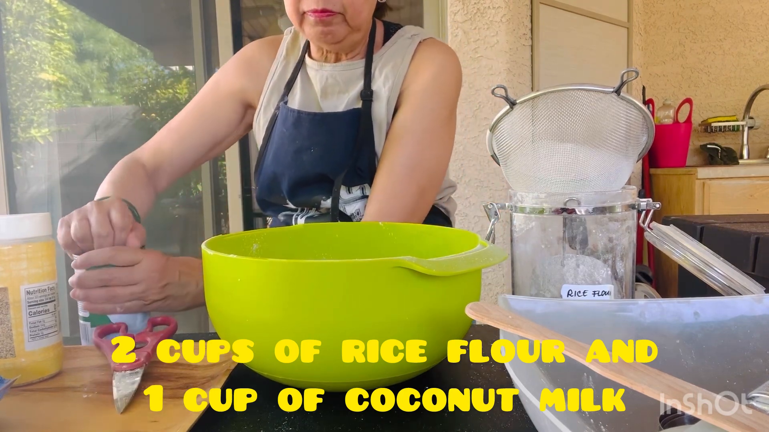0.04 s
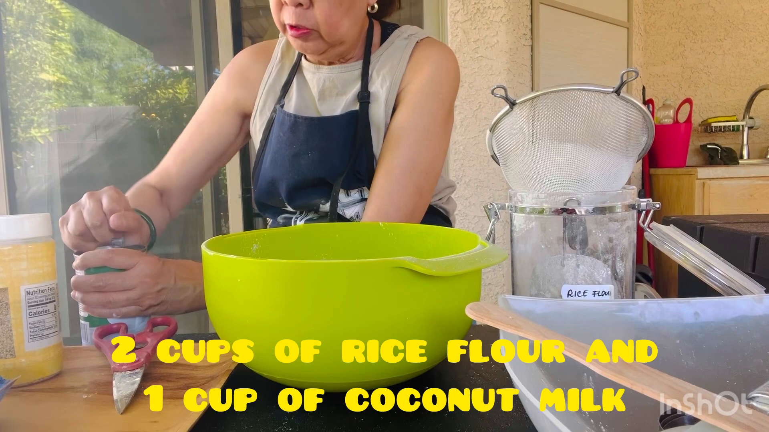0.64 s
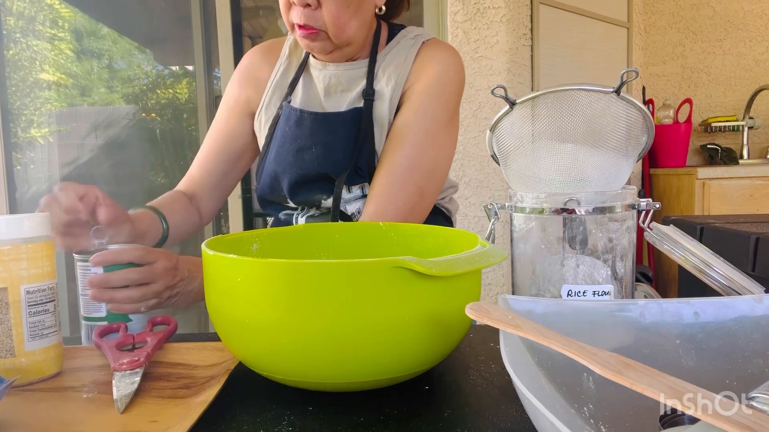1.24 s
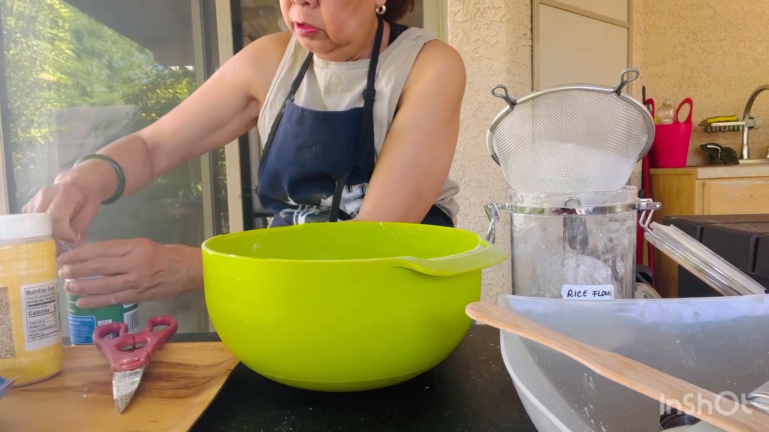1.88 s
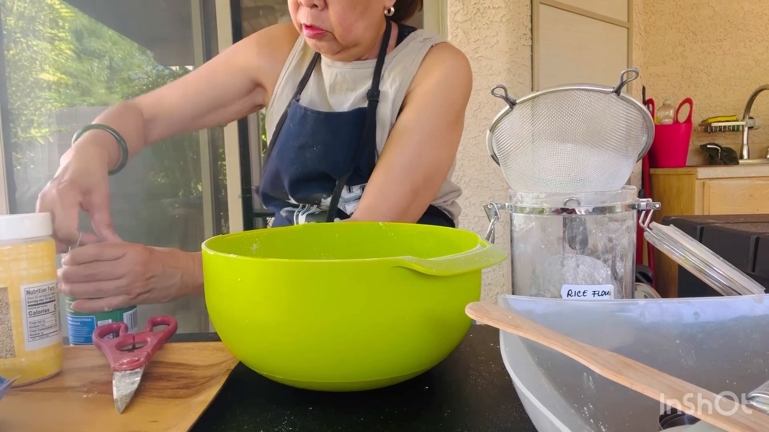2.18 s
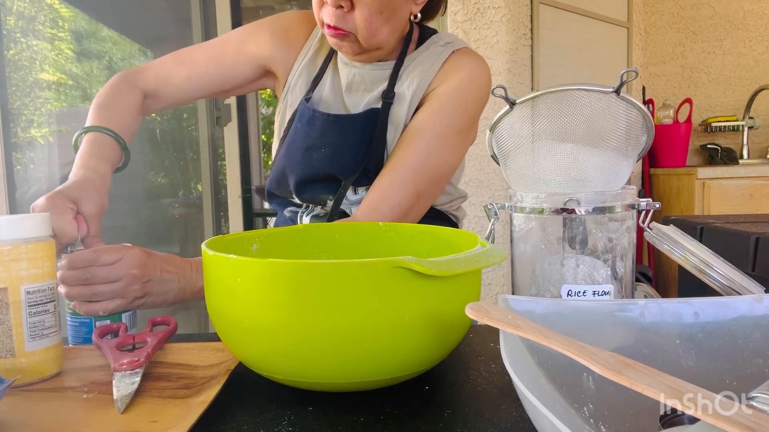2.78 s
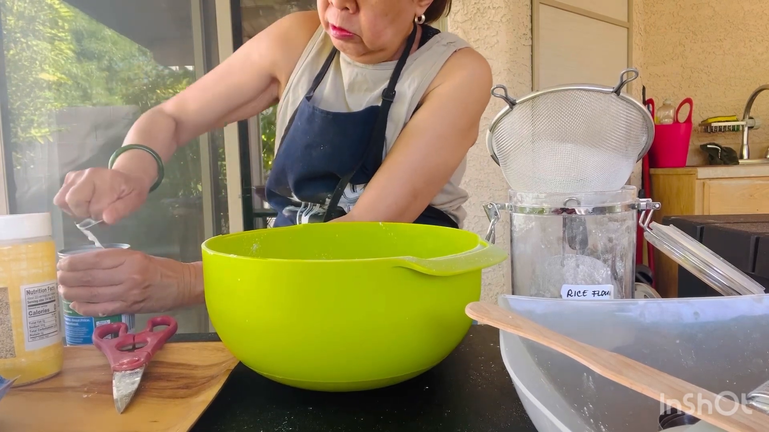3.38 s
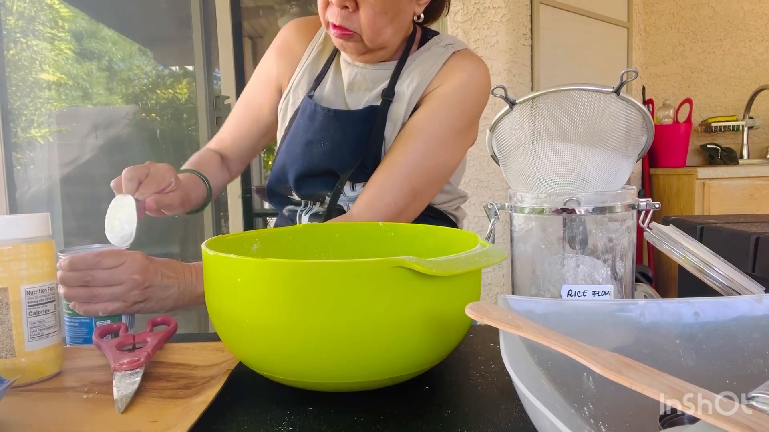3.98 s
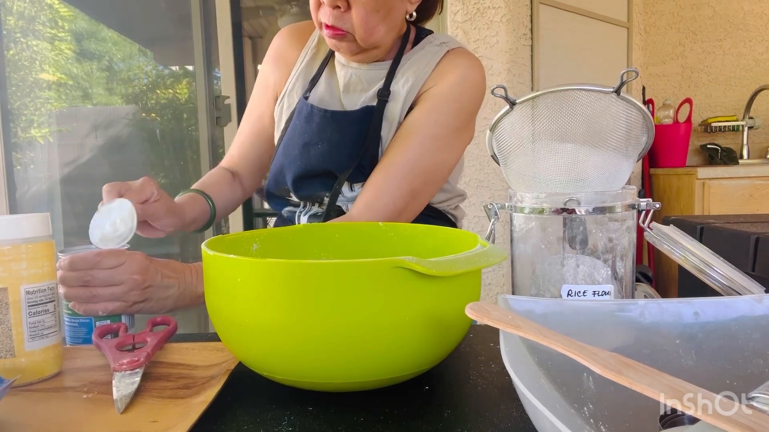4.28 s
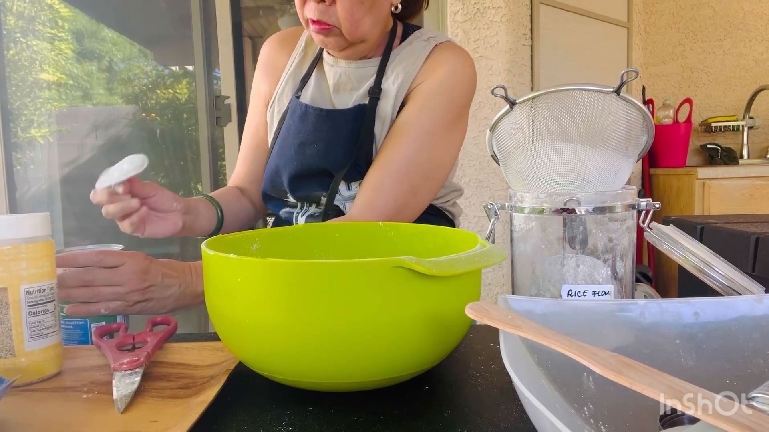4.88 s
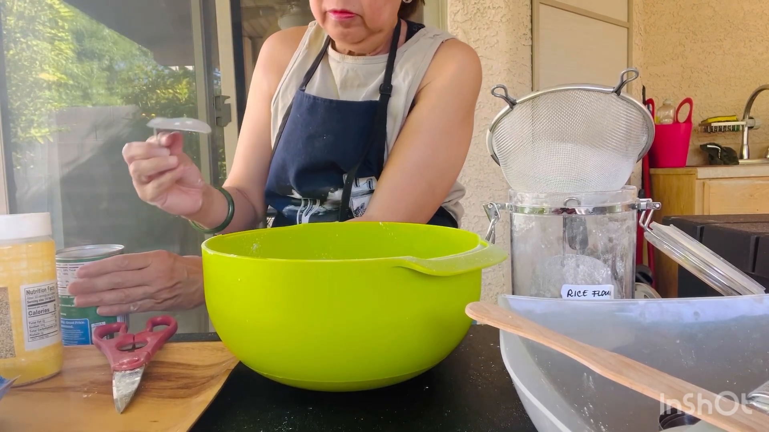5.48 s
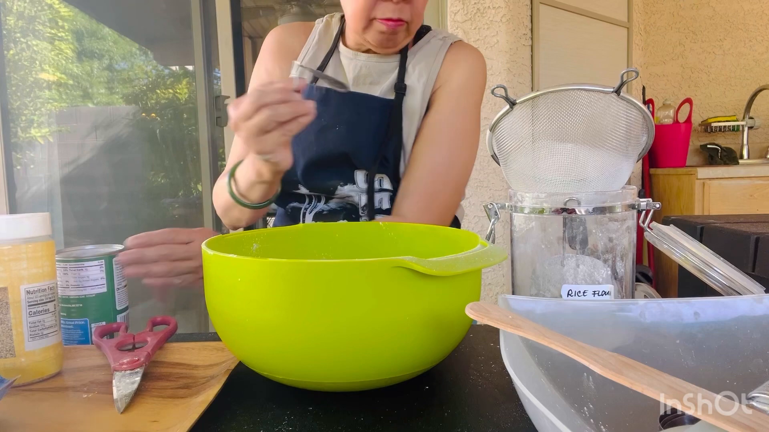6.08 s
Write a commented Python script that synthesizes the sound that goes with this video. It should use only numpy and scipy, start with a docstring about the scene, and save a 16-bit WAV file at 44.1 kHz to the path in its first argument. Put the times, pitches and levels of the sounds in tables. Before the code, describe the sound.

A ring-pull can is opened on a wooden board on a covered patio, close to the microphone and slightly left. The tab pierces the lid with a sharp metallic crack. Fingers softly rub, tap and scratch the can. Then the lid buckles with a crunch and a dull thump, peels back in scratchy jerks and snaps free. Low machine hum and outdoor rumble continue throughout.

```python
"""A ring-pull can is opened on a wooden board on a covered patio, a little left of the microphone.
Machines hum throughout. Hands rub the can, and at 0.6 s the tab pierces the lid. Fingers tap and
scratch; at 2.8 s the lid buckles, then peels along its score in jerks and snaps free near 4.1 s.
Each fracture is a train of impulses exciting the lid's modes, which differ from stage to stage.
Last come a few faint rubs and one soft low tone."""
import sys
import numpy as np
from scipy import signal
from scipy.fft import rfft, irfft, next_fast_len
from scipy.io import wavfile
from scipy.ndimage import uniform_filter1d, map_coordinates

SR = 44100
rng = np.random.default_rng(int(sys.argv[2]) if len(sys.argv) > 2 else 0)


def dump_mix(stems):
    """Bounce the given channels to the path in sys.argv[1] as a 16-bit WAV at rate SR."""
    frames = np.atleast_2d(stems).T  # one column per channel
    limited = np.clip(frames, -1, 1)  # hard clip at full scale
    pcm = np.round(limited * 32767).astype(np.int16)
    wavfile.write(sys.argv[1], SR, pcm)


N = 270887

# outdoor rumble: f/Hz, relative spectral level/dB
RUMBLE_SPECTRUM = [(12, -45.5), (20, -21), (38, -15), (62, -12.5), (86, -5), (123, -4.5), (149, -8.5),
                   (236, -11), (270, -11), (451, -16.5), (735, -21.5), (1230, -27), (2360, -43),
                   (5920, -58.5), (13000, -73.5)]
# rumble and nearby scatter: f/Hz, left-right coherence
RUMBLE_COHERENCE = [(60, 0.94), (130, 0.81), (290, 0.58), (640, 0.034), (3000, 0.051), (12000, 0.52)]
SCATTER_COHERENCE = [(1000, 0.89), (2500, 0.1), (6500, 0.1), (9000, 0.94), (11000, 1)]
# machine partials: f/Hz, level/dB, waver/dB
HUM_PARTIALS = [(38.4, -60, 2), (54.6, -53.5, 2.5), (78.7, -60, 6), (118.45, -57.5, -0.5),
                (126.9, -63, -0.5), (237.7, -66, 3.5)]
# patio reverberation: f/Hz, T60/s
PATIO_T60 = [(150, 0.21), (800, 0.23), (2000, 0.21), (6000, 0.2), (12000, 0.18), (15000, 0.091)]
# board to microphone ports: f/Hz, left minus right level/dB
PORT_BALANCE = [(200, 0), (550, 3), (900, 2), (2000, -2.5), (4000, -2.5), (5500, -5), (7500, -5), (9500, 2),
                (11000, -1)]
# the same path: f/Hz, phase lead of the left port/rad
PORT_LEAD = [(100, 0), (1200, 0.76), (2300, 1.3), (4600, 3), (5500, 4.5), (7000, 3), (9600, 5),
             (10800, 5.5), (12600, 6), (14500, 10)]
# spectral envelopes of reflections, skin friction, can, tab and lid stages: f/Hz, relative level/dB
WALL_COLOUR = [(500, 3), (1000, -2), (2200, 2), (4200, 1.5), (5500, -5.5), (7500, -6), (13000, -3)]
SKIN_COLOUR = [(150, -66.5), (400, -1.5), (800, 7), (1600, 3), (2600, -1.5), (4500, -3.5), (6500, -3.5),
               (8300, -8), (11000, -7.5), (13200, -7.5), (14500, -15.5), (16000, -51.5)]
CAN_COLOUR = [(120, 6), (200, 11.5), (350, -4), (650, -7), (1300, -7.5), (2500, -23), (5000, -22),
              (12000, -24.5), (16000, -49)]
TAB_COLOUR = [(150, -9.5), (600, 3.5), (1600, -10), (3300, -16.5), (6500, -13), (9000, -17), (13000, -24.5),
              (16000, -42)]
SEALED_COLOUR = [(150, -4), (430, -11.5), (700, -2.5), (950, -4), (1400, -13), (2050, -1), (2700, -10),
                 (3400, 2), (4400, -1), (5500, 5), (7000, 0.5), (9000, 1), (13000, -1), (16000, -16)]
BUCKLED_COLOUR = [(45, -28.5), (80, 6), (130, 1), (220, -9), (450, -1.5), (620, -11.5), (900, -3.5),
                  (1250, -4), (1800, -9), (2700, -15), (5300, -9), (8500, -14.5), (12000, -21.5),
                  (16000, -33)]
PEELED_COLOUR = [(150, 5), (580, 9), (1100, 4.5), (1400, -3.5), (2100, -2), (2900, -10), (4300, -10.5),
                 (7000, -16), (8400, -22.5), (10500, -24), (13500, -23.5), (16000, -44)]
LOOSE_COLOUR = [(150, -0.5), (350, -5.5), (550, -1.5), (780, -3), (1050, -0.5), (1450, -1.5), (2000, -0.5),
                (2800, 1), (4100, 1), (5300, 6), (7000, 4.5), (12000, 1.5), (14000, -1.5), (16000, -17.5)]
# modes standing above those envelopes: f/Hz, bandwidth/Hz, lift/dB
CAN_PEAKS = [(570, 20, 4.9), (700, 7.5, 18.7), (1660, 21, 5.2)]
TAB_PEAKS = [(565, 25, 24), (1600, 21, 20), (3316, 65, 23.5), (4160, 100, 13), (4900, 30, 24.5),
             (8800, 210, 19.5)]
SEALED_PEAKS = [(690, 26, 7), (944, 140, 1.2), (1939, 120, 2.5), (2200, 110, 2.9), (3450, 260, 2),
                (5490, 310, 2.7), (8440, 220, 3), (12530, 160, 3)]
BUCKLED_PEAKS = [(488, 54, 2.9), (1820, 180, 3.5), (2250, 180, 9.7), (3155, 115, 11), (5240, 150, 5),
                 (6940, 170, 5)]
PEELED_PEAKS = [(1230, 45, 8.5), (1660, 69, 4.9), (1813, 39, 12.2), (2230, 38, 9.4), (2850, 45, 5),
                (3540, 240, 5.5), (4180, 130, 9.5)]
LOOSE_PEAKS = [(457, 30, 8.6), (564, 70, 3.1), (1120, 40, 4), (1470, 85, 3), (2120, 45, 3.5),
               (2480, 27, 7.4), (3140, 91, 7.2), (4720, 90, 6), (5950, 50, 3), (7330, 73, 3.6),
               (9250, 60, 4.7)]
# faint tones: centre t/s, f/Hz, level/dB, half-duration/s, phase waver/rad
FAINT_TONES = [(2.614, 3980, -67.5, 0.0053, 4.3), (3.284, 4010, -80.5, 0.068, 0.77),
               (4.362, 6000, -73, 0.052, 1.58), (5.665, 451, -54.5, 0.055, 0.27)]
# hands and cloth slide: peak t/s, relative level/dB, duration/s, extra hiss/dB
SLIDES = [(0.106, -66.5, 0.064, 1), (0.223, -67, 0.11, -3), (0.825, -61.5, 0.2, -11.5),
          (1.121, -60, 0.11, -3), (1.507, -61.5, 0.27, -0.5), (1.629, -56.5, 0.021, 7),
          (1.648, -62, 0.18, 5), (2.044, -72.5, 0.13, 3.5), (2.436, -74, 0.19, 0),
          (4.564, -63.5, 0.053, -4), (4.86, -87.5, 0.063, 11.5), (6.14, -62, 0.11, -6.5)]
# fingers on the can: peak t/s, level/dB, duration/s, touched spot's resonance f/Hz
FINGER_TAPS = [(1.164, -52, 0.014, 1190), (1.281, -48.5, 0.047, 920), (1.337, -39, 0.0046, 724),
               (1.382, -42, 0.0055, 700), (1.497, -49, 0.015, 1150), (1.624, -42, 0.016, 744),
               (1.655, -47, 0.011, 1080), (1.664, -46, 0.076, 200), (1.79, -52, 0.019, 870),
               (1.831, -50, 0.023, 590), (2.051, -50.5, 0.0055, 560), (2.121, -55, 0.019, 580),
               (2.563, -55, .003, 700), (2.638, -61.5, 0.0035, 760)]
# fingernail on the tab: peak t/s, level/dB, duration/s
NAIL_SCRATCHES = [(2.052, -47.5, 0.014), (2.107, -55.5, 0.039)]
# the can jolts the board: t/s, level/dB, f/Hz
BOARD_THUMPS = [(0.621, -45, 183.5), (2.831, -34, 81.6), (3.36, -41, 69)]
# lid stages (sealed, buckled, peeled, loose): start t/s
STAGE_TIMES = [0, 2.7, 2.95, 3.53]
# radiation of the tilting lid, by stage: left minus right level/dB
STAGE_BALANCE = [-1.2, 1.6, 0.62, -0.33]
# sound sent to the walls, by stage: relative level/dB
STAGE_REVERB = [-9, -7, -6.5, -6.5]
# zing of the torn edge: t/s, lift/dB
EDGE_LIFT = [(3.5, -11), (3.58, 10.5), (3.66, -5), (3.78, -9), (3.89, -11), (3.935, 9), (3.98, 15),
             (4.075, 9.5), (4.22, 13)]
# one resonance per strain on the lid: start t/s, f/Hz, glide/(octave/s), lift/dB, Q
LID_STRAINS = [(0.6, 866, 0.5, 13.5, 4), (0.619, 2020, -0.5, 9, 4.2), (2.775, 644, 7, 20.5, 5.1),
               (2.82, 880, 8.5, 20, 7.3), (2.853, 1170, 9, 16, 3.9), (2.98, 1580, -1, 15.5, 3.4),
               (3.04, 1240, -13, 16.5, 3.5), (3.085, 1410, 3, 24, 8.4), (3.14, 1490, 4, 20.5, 6),
               (3.195, 1790, -0.5, 13.5, 12), (3.33, 1840, 0, 10.5, 15), (3.41, 1800, 0.5, 8.5, 5),
               (3.55, 2040, -1, 11.5, 14), (3.62, 550, 4, 3, 5.7), (3.75, 1530, 2, 19, 7.3),
               (3.83, 1470, -2.5, 13, 3.7), (3.91, 1340, 2, 15.5, 8.2), (3.955, 950, 5, 4, 1.6),
               (4.06, 1550, 12, 4, 4), (4.19, 1094, -3, 14.5, 5)]
# gradual tearing: peak t/s, level/dB, duration/s, tilt/(dB/octave)
LID_PULLS = [(0.618, -21, 0.0028, -0.5), (2.781, -46, 0.0029, -5.5), (2.807, -29.5, 0.0054, 1.5),
             (2.832, -23.5, 0.0078, 0.5), (2.845, -25.5, 0.0043, -2), (2.863, -32, 0.0089, -2),
             (2.874, -38, 0.0096, -2.5), (3.023, -44, 0.026, 0), (3.063, -43, 0.022, 2.5),
             (3.107, -43, .016, 2), (3.168, -39.5, 0.019, 3.5), (3.203, -43.5, 0.02, 1),
             (3.264, -50.5, 0.021, 4.5), (3.368, -44.5, 0.017, 2.5), (3.46, -42, 0.024, 2.5),
             (3.597, -42, 0.027, -5), (3.635, -45, 0.0162, -8.5), (3.691, -58.5, 0.04, -9),
             (3.781, -51, 0.012, -6), (3.871, -47.5, 0.021, -5.5), (3.934, -37.5, 0.018, -4),
             (3.974, -37.5, 0.024, -7.5), (4.09, -34.5, 0.0067, -1), (4.222, -52.5, 0.025, -5),
             (4.325, -59, 0.023, -6.5)]
# sudden fractures: t/s, level/dB, tilt/(dB/octave)
LID_SNAPS = [(0.6022, -31.5, -6), (0.6146, -17.5, -2.5), (0.6206, -15.5, 4), (0.6242, -9.5, 1),
             (2.8301, -28.5, 3), (2.865, -34, 2), (3.06, -44, -6), (3.165, -35, -2), (3.179, -42, -1.5),
             (3.357, -37, 5), (3.778, -49, -4), (3.8507, -42, -1.5), (3.8659, -36, -0.5), (3.885, -38, 1),
             (3.921, -34, -1), (3.9372, -26, 1), (3.948, -31, -2), (3.962, -23.5, -1.5), (3.972, -29, -6),
             (3.981, -27.5, 3), (3.987, -28.5, -1), (4.0704, -17.5, 0.5), (4.0739, -13.5, -0.5),
             (4.081, -22.5, 0.5), (4.085, -24, -3.5)]
# crack statistics: rate/(1/s), rise as a multiple of duration, size spread/dB, main crack's weight
PULL_CRACKS = (2200, 1.16, 5, 0)
SNAP_CRACKS = (4900, 0.65, 7.3, 0.42)


def amp(db):
    """Amplitude ratio of a level in decibels."""
    return 10 ** (np.asarray(db) / 20)


def unit(x):
    """Normalisation to unit rms."""
    return x / np.sqrt(np.mean(x ** 2) + 1e-20)


def along(points, hz):
    """Interpolation on a logarithmic frequency axis."""
    f, v = np.transpose(points)
    return np.interp(np.log(hz + 1), np.log(f + 1), v)


def wobble(rate):
    """Random modulation: a spline through `rate` knots a second."""
    return map_coordinates(rng.standard_normal(int(N * rate / SR) + 4), [np.arange(N) * rate / SR])


def filtered(x, response):
    """Linear filtering: the spectrum times a frequency response."""
    n = x.shape[-1]
    m = next_fast_len(n + SR // 8)
    return irfft(rfft(x, m) * response(np.fft.rfftfreq(m, 1 / SR)), m)[..., :n]


def blend(pair, coherence):
    """Partial coherence: sum and difference of two independent, weighted noises."""
    angle = lambda hz: np.arccos(np.clip(along(coherence, hz), -1, 1)) / 2
    mid, side = filtered(pair, lambda hz: np.array([np.cos(angle(hz)), np.sin(angle(hz))]))
    return np.array([mid + side, mid - side])


def coloured_noise(spectrum, coherence):
    """Spectral shaping of stereo white noise, at unit rms."""
    white = blend(rng.standard_normal((2, N)), coherence)
    return unit(filtered(white, lambda hz: amp(along(spectrum, hz))))


def background(rumble_db=-54, drift_rad=0.48):
    """Superposition: machine partials, wavering in amplitude and phase, over outdoor rumble."""
    t = np.arange(N) / SR
    hum = 0
    for hz, db, waver_db in HUM_PARTIALS:
        envelope = amp(waver_db * wobble(4))
        hum += amp(db) * unit(envelope * np.sin(2 * np.pi * hz * t + drift_rad * wobble(4.3)))
    return hum + amp(rumble_db) * coloured_noise(RUMBLE_SPECTRUM, RUMBLE_COHERENCE)


def patio(near_db=1.0, near_t60=0.02, far_db=-6.0, far_rise_s=0.0023):
    """Impulse response: direct sound, scatter from a bowl and jars, reverberation of walls and roof."""
    hz, t, spectra = signal.stft(rng.standard_normal((2, SR // 3)), SR, nperseg=256)
    decay = amp(-60 * t / along(PATIO_T60, hz)[:, None])
    far = signal.istft(spectra * decay, SR, nperseg=256)[1]
    t = np.arange(far.shape[1]) / SR
    far = far * (1 - np.exp(-t / far_rise_s))
    far = filtered(far / np.linalg.norm(far[0]), lambda hz: amp(along(WALL_COLOUR, hz)))
    near = blend(rng.standard_normal(far.shape), SCATTER_COHERENCE) * amp(-60 * t / near_t60)
    near = filtered(near, lambda hz: hz / (hz + 1500))  # small things scatter only short waves
    path = amp(near_db) * near / np.linalg.norm(near[0]) + amp(far_db) * far
    path[:, 0] += 1
    return path


def faint_tones(wavers_per_s=200):
    """Phase-modulated tone bursts: thin squeaks of the bending lid and one soft low tone."""
    t = np.arange(N) / SR
    tones = 0
    for s, hz, db, length, waver in FAINT_TONES:
        envelope = amp(db) * np.exp(-((t - s) / length) ** 2)
        tones += envelope * np.sin(2 * np.pi * hz * t + waver * wobble(wavers_per_s))
    return tones


def shifting_contact(x, depth_db):
    """A shifting contact modulates the noise in patches of frequency and time."""
    spectra = signal.stft(x, nperseg=512)[2]
    field = uniform_filter1d(rng.standard_normal(spectra.shape[1:]), size=5, axis=0)
    field = uniform_filter1d(field, size=7, axis=1)
    return unit(signal.istft(spectra * amp(depth_db * unit(field)), nperseg=512)[1][:, :N])


def rubbing(gain_db=2, resting_db=-83.0, grain_db=0.5, hiss_hz=3500, ripple_db=2, ripple_hz=60):
    """Friction noise of skin and cloth, coloured by the can's weak modes; slides add in power."""
    t = np.arange(N) / SR
    modes = rng.standard_normal(SR // 2)
    ripple = lambda hz: amp(ripple_db * map_coordinates(modes, [hz / ripple_hz]))
    noise = unit(filtered(coloured_noise(SKIN_COLOUR, SCATTER_COHERENCE), ripple))
    noise = amp(gain_db + grain_db * wobble(110)) * shifting_contact(noise, depth_db=2.5)
    hiss = filtered(noise, lambda hz: hz ** 2 / (hz ** 2 + hiss_hz ** 2))
    body_power = hiss_power = amp(resting_db) ** 2  # resting hands are never quite still
    for s, db, length, hiss_db in SLIDES:
        width = length * np.where(t < s, 0.81, 0.91)  # rise, fade
        power = amp(db) ** 2 * np.exp(-((t - s) / width) ** 2)
        body_power = body_power + power
        hiss_power = hiss_power + power * amp(hiss_db) ** 2
    return np.sqrt(body_power) * (noise - hiss) + np.sqrt(hiss_power) * hiss


def metal_response(colour, modes, tilt_db, low_hz=0, ripple_db=2, ripple_hz=70, size=16384):
    """Modal resonance: the minimum-phase impulse response of thin metal."""
    hz = np.fft.rfftfreq(size, 1 / SR)
    lift = 1 + sum(amp(db) ** 2 / (1 + (2 * (hz - centre) / width) ** 2) for centre, width, db in modes)
    tilt = tilt_db * np.log2(np.maximum(hz, 600)) - 10 * np.log10(1 + (low_hz / (hz + 1)) ** 2)
    # countless weak modes shift with every change of grip and strain
    ripple = ripple_db * map_coordinates(rng.standard_normal(size), [hz / ripple_hz])
    magnitude = amp(along(colour, hz) + tilt + ripple) * np.sqrt(lift)
    cepstrum = irfft(np.log(magnitude))
    cepstrum[1:size // 2] *= 2  # folding the cepstrum makes the response causal
    cepstrum[size // 2 + 1:] = 0
    return irfft(np.exp(rfft(cepstrum)))


def bending(x, times, strain):
    """A time-varying resonator: one mode glides in frequency as the lid bends."""
    start, start_hz, glide, lift_db, q = strain
    hz = start_hz * 2 ** (glide * np.clip(times - start, 0, .15))
    carrier = np.exp(2j * np.pi * np.cumsum(hz) / SR)
    pole = np.exp(-np.pi * start_hz / q / SR)
    resonance = np.real(carrier * signal.lfilter([1 - pole], [1, -pole], x / carrier))
    return x + 2 * (amp(lift_db) - 1) * resonance


def add_cracks(track, s, db, length, response, path, cracks_per_s=6000, rise=0.69, spread_db=4,
               main_crack=0, clump_db=2.0, clumps_per_s=220, fade=1.4, strain=None):
    """Stick-slip excitation: random impulses swell to time s and fade, convolved with metal and path."""
    t = np.arange(-SR // 10, SR // 10) / SR
    occurs = rng.random(len(t)) < cracks_per_s / SR
    sizes, clumps = rng.standard_normal((2, len(t)))
    size_db = spread_db * sizes + clump_db * map_coordinates(clumps, [(t - t[0]) * clumps_per_s])
    swell = np.exp(-(t / (length * np.where(t < 0, rise, fade))) ** 2)
    cracks = occurs * np.sign(rng.standard_normal(len(t))) * amp(size_db) * swell
    cracks[len(t) // 2] += main_crack * np.linalg.norm(cracks)  # in a snap one crack stands out
    if strain is not None:
        cracks = bending(cracks, s + t, strain)
    ringing = signal.fftconvolve(cracks, response)
    heard = signal.fftconvolve(ringing[None], path, axes=1)
    heard *= amp(db) * np.sqrt(2 * length * SR) / (np.linalg.norm(heard) + 1e-20)
    place = track[:, round((s + t[0]) * SR):][:, :heard.shape[1]]
    place += heard[:, :place.shape[1]]


def fingers(path, spot_q=5, spot_db=10):
    """Damped vibration: soft knocks and scrapes excite the full can, held in the hand."""
    track = np.zeros((2, N))
    for s, db, length, spot_hz in FINGER_TAPS:
        modes = [*CAN_PEAKS, (spot_hz, spot_hz / spot_q, spot_db)]
        add_cracks(track, s, db, length, metal_response(CAN_COLOUR, modes, tilt_db=-1.0), path)
    return track


def tab(path):
    """Frictional excitation: a fingernail scratches the raised tab, whose modes ring faintly."""
    track = np.zeros((2, N))
    for s, db, length in NAIL_SCRATCHES:
        add_cracks(track, s, db, length, metal_response(TAB_COLOUR, TAB_PEAKS, tilt_db=0), path)
    return track


def board_thumps(t60=0.28, rise_s=.006):
    """Reaction force: as the lid gives way, the can pushes the board, a damped oscillator."""
    thumps = 0
    for s, db, hz in BOARD_THUMPS:
        t = np.maximum(np.arange(N) / SR - s, 0)
        envelope = amp(db - 60 * t / t60) * (1 - np.exp(-t / rise_s))
        thumps += envelope * np.sin(2 * np.pi * hz * t)
    return thumps


def lid(snap_s=0.0014, snap_low_hz=600, edge_hz=5520, edge_width_hz=520):
    """Fracture along the score excites a plate whose modes change as it bends and comes free."""
    stages = [(SEALED_COLOUR, SEALED_PEAKS), (BUCKLED_COLOUR, BUCKLED_PEAKS),
              (PEELED_COLOUR, PEELED_PEAKS), (LOOSE_COLOUR, LOOSE_PEAKS)]
    stage_at = lambda s: np.searchsorted(STAGE_TIMES, s) - 1
    strain_times = [row[0] for row in LID_STRAINS]
    # hand and lid move with each strain, and the reflections with them
    paths = [patio(far_db=STAGE_REVERB[stage_at(s)]) for s in strain_times]
    # a snap is too brief to drive the lid much below snap_low_hz
    snaps = [(s, db, snap_s, tilt_db, SNAP_CRACKS, snap_low_hz) for s, db, tilt_db in LID_SNAPS]
    pulls = [(*pull, PULL_CRACKS, 0) for pull in LID_PULLS]
    track = np.zeros((2, N))
    for s, db, length, tilt_db, grain, low_hz in snaps + pulls:
        colour, modes = stages[stage_at(s)]
        pan = amp(STAGE_BALANCE[stage_at(s)] * np.array([[.5], [-.5]]))
        bend = np.searchsorted(strain_times[1:], s)
        edge = (edge_hz, edge_width_hz, np.interp(s, *np.transpose(EDGE_LIFT)))
        response = metal_response(colour, [*modes, edge], tilt_db, low_hz)
        add_cracks(track, s, db, length, response, pan * paths[bend], *grain, strain=LID_STRAINS[bend])
    return track


def scene():
    """Superposition at two ports, which the can's sound reaches with level and phase differences."""
    path = patio()
    can = lid() + fingers(path) + tab(path) + rubbing()
    sides = np.array([[.5], [-.5]])
    ports = lambda hz: amp(sides * along(PORT_BALANCE, hz)) * np.exp(1j * sides * along(PORT_LEAD, hz))
    return filtered(can, ports) + board_thumps() + background() + faint_tones()


def record(dry, low_hz=20, top_hz=15600):
    """Band limiting: the deepest bass is dropped and the treble ends steeply above top_hz."""
    thinned = filtered(dry, lambda hz: 1 - 1 / (1 + (hz / low_hz) ** 4))
    return filtered(thinned, lambda hz: 1 / (1 + (hz / top_hz) ** 80))


dry = scene()
out = record(dry)
dump_mix(out)
```